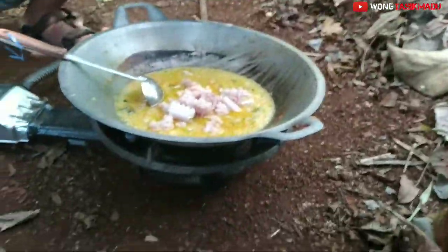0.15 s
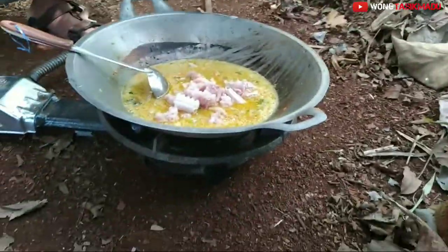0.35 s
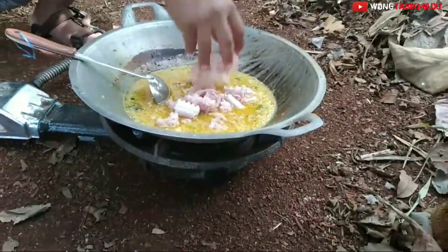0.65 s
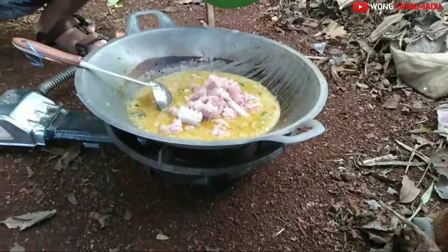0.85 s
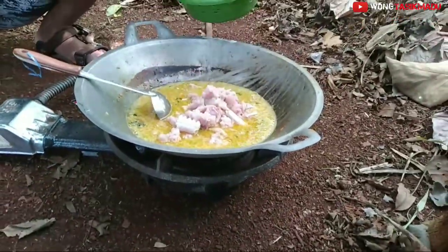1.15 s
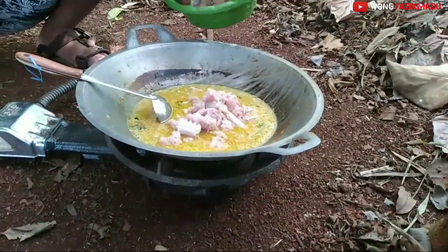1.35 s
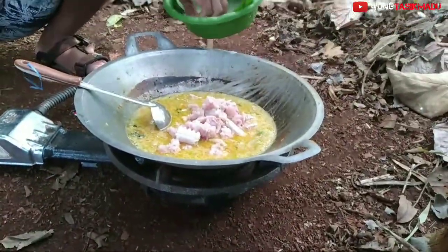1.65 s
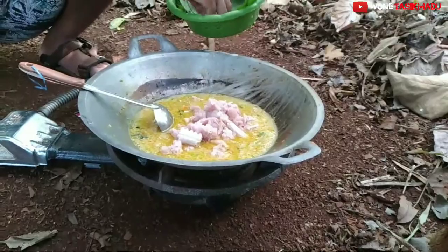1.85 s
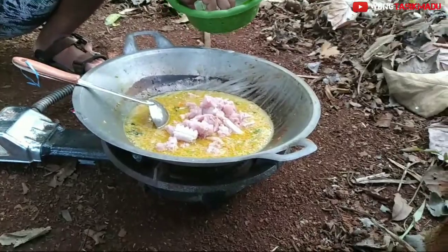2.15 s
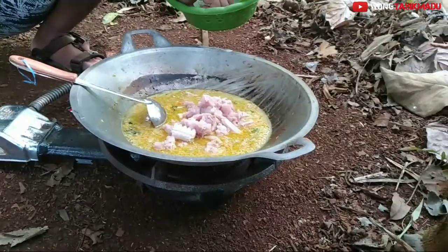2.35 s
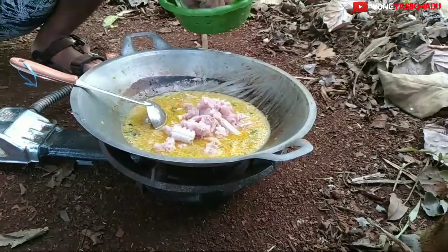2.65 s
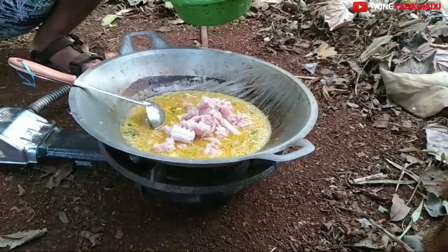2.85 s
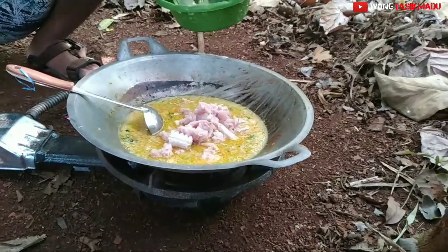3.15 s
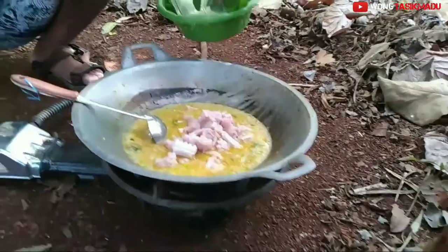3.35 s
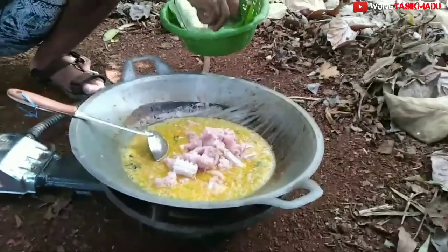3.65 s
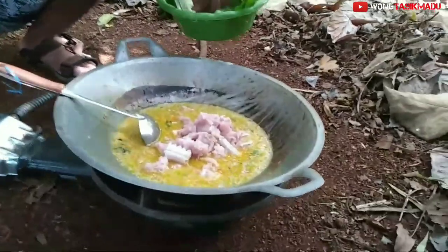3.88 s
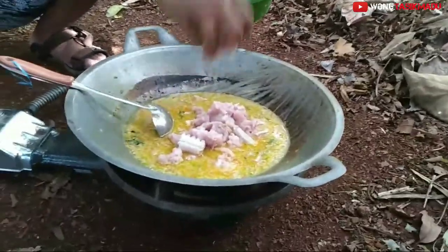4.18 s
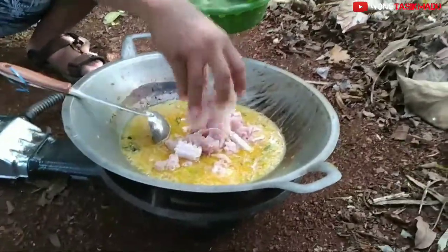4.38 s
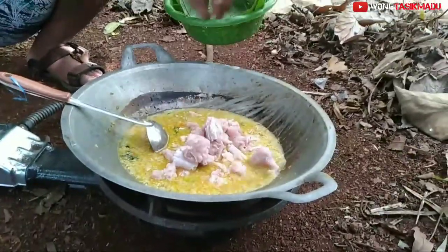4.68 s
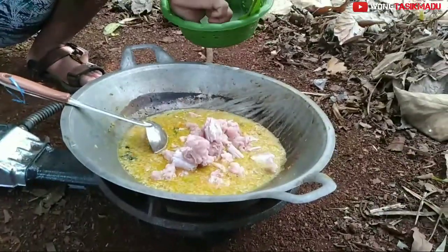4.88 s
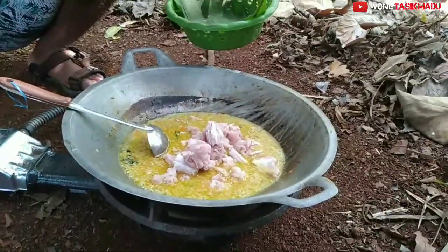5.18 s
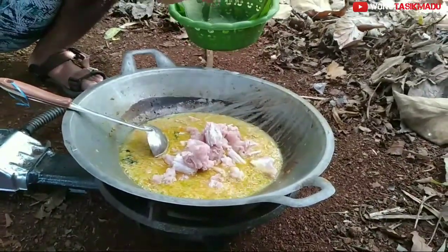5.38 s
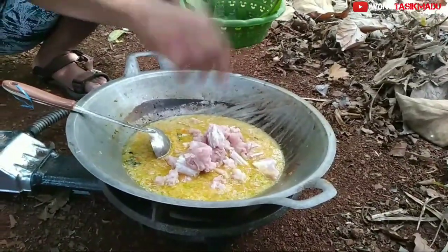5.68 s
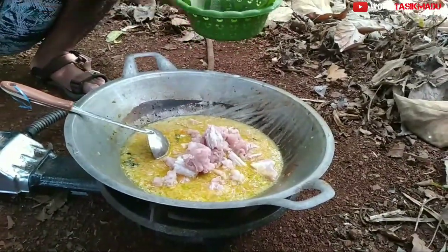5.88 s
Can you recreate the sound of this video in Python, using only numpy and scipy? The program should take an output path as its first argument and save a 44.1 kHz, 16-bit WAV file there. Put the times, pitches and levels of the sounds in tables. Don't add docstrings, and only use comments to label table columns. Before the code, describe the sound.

Outdoors, a wok of broth sizzles close by over a gas ring, its fine steam hiss surging and dipping. After half a second it becomes livelier, with sharp spits, brief flares on hot metal and small wet plops as meat drops in. Soft thumps come from the ground, and a distant engine hums faintly later. A phone picks it up in wide, uneven stereo, with the crisp treble stronger on the right and the top end slightly ragged.

```python
import sys
import numpy as np
from scipy import signal
from scipy.io import wavfile
from scipy.ndimage import uniform_filter1d, minimum_filter1d

SR = 44100
rng = np.random.default_rng(int(sys.argv[2]) if len(sys.argv) > 2 else 0)


def boost_factor(decibels):
    exponent = np.asarray(decibels, float) / 20
    return 10 ** exponent


def generate_wav(signal):
    frames = np.transpose(np.atleast_2d(signal))
    scaled = np.clip(frames, -1, 1) * 32767
    pcm = np.round(scaled).astype(np.int16)
    wavfile.write(sys.argv[1], SR, pcm)


N = 265923


def rms_one(x):
    return x / np.sqrt(np.mean(x ** 2) + 1e-20)


def in_time(rows):
    s, *columns = np.transpose(rows)
    return [np.interp(np.arange(N) / SR, s, c) for c in columns]


def at_hz(points, hz):
    points_hz, level_db = np.transpose(points)
    return np.interp(np.log(hz), np.log(points_hz), level_db)


def drift(rate_hz):
    r = np.exp(-80 * np.pi * rate_hz / SR)
    slow = signal.lfilter([1], [1, -2 * r, r * r], rng.standard_normal(N // 40 + 2002))[2000:]
    return np.interp(np.arange(N) / 40, np.arange(len(slow)), rms_one(slow))


def swells(rows):
    t = np.arange(N) / SR
    total_db = np.zeros(N)
    for crest_s, height_db, rise_s, fall_s in rows:
        corners_s = [crest_s - max(rise_s, .002), crest_s, crest_s + max(fall_s, .002)]
        total_db += np.interp(t, corners_s, [0, height_db, 0])
    return total_db


def resonance(x, hz, width_hz):
    r = np.exp(-np.pi * width_hz / SR)
    return signal.lfilter([(1 - r * r) / 2, 0, (r * r - 1) / 2], [1, -2 * r * np.cos(2 * np.pi * hz / SR), r * r], x)


def modes(x, table):
    return sum(boost_factor(db) * resonance(x, hz, width) * (-1) ** k for k, (hz, width, db) in enumerate(table))


# time_s, level_db
RIM_HEAT = [(0, -56.5), (.53, -58.5), (.66, -54), (1.03, -54), (1.14, -53), (1.93, -54.5), (2.42, -52.5),
            (2.65, -49.5), (3.04, -46), (3.22, -48), (4.1, -47.5), (4.32, -53), (4.5, -45.5), (4.68, -56),
            (5.146, -49), (5.156, -46), (5.64, -46.5), (6.03, -51)]
# crest_s, over_heat_db, rise_s, fall_s
BOIL_SURGES = [(.244, 5.5, 0.028, 0.075), (.6, 1.5, 0.097, .005), (.67, 1.5, 0.074, 0.016),
               (.72, 8, 0.014, 0.026), (.84, 6, 0.074, 0.04), (1.435, 5, .012, .015),
               (1.055, 9.5, 0.021, 0.036), (1.24, 3.5, 0.13, 0.039), (1.44, 3.5, 0.17, 0.18),
               (1.65, 5, 0.11, 0.013), (1.8, 7, 0.14, 0.064), (1.9, 8, 0.039, 0.017),
               (2.05, 7.5, 0.14, 0.018), (2.14, 7, 0.12, 0.041), (2.25, 8.5, 0.084, 0.062),
               (2.33, 5.5, 0.019, 0.084), (2.45, 5.5, 0.023, 0.16), (3.35, 2, .04, 0.018),
               (3.47, 8, .1, 0.05), (3.62, 3.5, 0.18, 0.011), (3.71, 8.5, 0.033, 0.038),
               (3.76, 7.5, 0.01, 0.011), (3.83, 3, 0.032, 0.13), (4.02, 8.5, 0.036, 0.084),
               (4.14, 7, 0.056, 0.4), (4.35, 4, 0.013, 0.073), (4.82, 10, 0.16, 0.01),
               (4.89, 8.5, 0.038, 0.084), (5.078, 3, .012, .015), (5.154, 7, 0.0043, 0.022),
               (4.649, 4.5, .005, 0.0028), (4.692, 8.5, 0.0087, 0.014), (4.915, 0, .008, 0.0073),
               (5.102, 9, .004, .004), (5.143, 3, .004, .005), (5.27, 2.5, 0.022, 0.044),
               (5.325, 6, .015, 0.018), (5.41, 3, .025, 0.1), (5.48, 2.5, 0.016, 0.018),
               (5.54, 0.5, .015, .015), (5.635, 0.5, .012, .01), (3.433, 3, .005, .01),
               (3.461, 2, .004, .006), (3.474, 4, .004, .005), (3.499, 4, .004, .006),
               (.709, 3, .003, .002), (2.95, 1.5, 0.046, .05)]
# crest_s, change_db, rise_s, fall_s
BOIL_SWINGS = [(.604, -1, .004, 0.024), (0.724, -15, 0.0037, 0.0054), (3.26, -8.5, 0.034, 0.065),
               (3.67, -1.5, 0.044, 0.016), (4.47, -4.5, 0.1, 0.019), (4.85, 0, .02, .02),
               (.61, 0, .008, .012), (.897, 2.5, .01, 0.014), (1.01, -1, .03, .02),
               (2.67, -3.5, 0.022, 0.023), (4.32, -3, .04, .015), (4.658, -2, .005, 0.012),
               (4.722, -6, .015, 0.018), (4.9, -9, 0.0055, 0.0088), (5.0, 1.5, .06, .06),
               (5.135, -7.5, 0.04, .012), (5.65, -8, .01, 0.066)]


def boil_db():
    return in_time(RIM_HEAT)[0] + swells(BOIL_SURGES + BOIL_SWINGS)


def boil_trend_db():
    return uniform_filter1d(boil_db(), size=4410) + 50


def boil_level():
    return np.sqrt(boost_factor(boil_db()) ** 2 + flare_power())


# left_port_lag_samples, level_db
PAN_SPOTS = [(16, -1), (14.5, -2), (30, -2), (8, -3.5), (-1.5, -3.5), (-12.5, -1.5), (-22, -1), (38.5, -6),
             (30, -25), (-34.5, -3.5)]


def steam_bursts(per_s, spread_db, flurry_db):
    out = np.zeros((2, N))
    for lag, spot_db in PAN_SPOTS:
        at = np.flatnonzero(rng.random(N) < per_s / SR)
        size, sign = rng.random((2, len(at)))
        bursts = np.zeros(N)
        bursts[at] = boost_factor(spread_db * np.minimum(-np.log(size), 5)) * np.sign(sign - .5)
        bursts *= boost_factor(spot_db + flurry_db * drift(21.0))
        out += [np.roll(bursts, round(lag)), bursts]
    rim_flutter_db = 0.79 * drift(38.0) + 0.3 * drift(92)
    return rms_one(out) * boost_factor(rim_flutter_db)


# freq_hz, density_db
BURST_COLOUR = [(700, -14), (1400, -19.5), (2200, -10.5), (3700, -3.5), (5200, -3), (6500, -1), (8500, -4),
                (12000, -1), (15500, -5.5)]


def burst_colour(x):
    hz = np.linspace(0, SR / 2, 257)
    shape = signal.firwin2(127, hz, boost_factor(at_hz(BURST_COLOUR, hz + 1)), fs=SR)
    return signal.fftconvolve(x, shape[None] / np.sqrt(np.sum(shape ** 2)), mode="same", axes=1)


# crest_s, above_11khz_db, rise_s, fall_s
MEAT_FIZZ = [
    (2.5, -2.5, 0.42, .6),
    (5.17, 4.5, 0.03, .5),
    (6.03, 10, 0.19, .1),
]
BRIGHT_DB, BRIGHT_PER_BOIL_DB = -1.5, -0.015
COLD_DULL_DB, WARM_AT_S, WARM_UP_S = -4, 0.56, 0.13


def brightness_db():
    cold_share = np.clip((WARM_AT_S - np.arange(N) / SR) / WARM_UP_S, 0, 1)
    return BRIGHT_DB + COLD_DULL_DB * cold_share + BRIGHT_PER_BOIL_DB * boil_trend_db() + swells(MEAT_FIZZ)


# time_s, left_minus_right_top_octave_db
PORT_TURN = [(0, -8), (1.06, -8.5), (1.16, -4.5), (2.0, -8), (2.62, -8), (3.59, -8), (3.81, -8),
             (4.05, -12.5), (4.77, -14), (6.03, -13)]
# freq_hz, width_hz, level_db
WOK_WALL = [(2460, 44, -2), (3295, 54, -3.5), (4060, 27, -4), (5860, 27, -6), (9740, 75, -4),
            (10780, 44, -8), (10650, 110, -7), (11350, 300, -16), (12100, 54, -8)]
# freq_hz, width_hz, level_db
PORT_CAVITY = [(9780, 1750, 0.5), (10970, 980, 6), (12350, 1600, -2), (15500, 1400, -3.5)]


def sizzle():
    turn_db, = in_time(PORT_TURN)
    bursts = boil_level() * boost_factor(turn_db + 8.0) * steam_bursts(1500, spread_db=-2.0, flurry_db=2.5)
    pan = burst_colour(bursts + spits())
    pan = pan + modes(pan, WOK_WALL)
    treble = signal.sosfiltfilt(signal.butter(2, 11500, "high", fs=SR, output="sos"), pan)
    left, right = pan + (boost_factor(brightness_db()) - 1) * treble
    return np.array([left, right + boost_factor(4.0 - turn_db) * modes(right, PORT_CAVITY)])


# freq_hz, correlation
PORT_LIKENESS = [(30, 1), (60, 0.65), (92, 0.83), (140, 0.97), (210, 0.91), (330, 0.68), (500, 0.9),
                 (770, 0.73), (1170, -0.28), (1790, -0.32), (2740, 0.088), (4190, -0.1), (6410, -0.033),
                 (9810, 0.72), (15000, 0.8)]


def banded_noise(spectrum, low_hz, count, patchy_db):
    out, edges = 0, low_hz * 2 ** (np.arange(count + 1) / 2)
    run_in = SR // 4
    white = rng.standard_normal((2, 2, N + run_in))
    for k, (low, high) in enumerate(zip(edges, edges[1:])):
        band = signal.butter(2, [low, high], "band", fs=SR, output="sos")
        mid, side = signal.sosfilt(band, white[k % 2])[:, run_in:]
        hz = np.sqrt(low * high)
        alike = np.clip(at_hz(PORT_LIKENESS, hz), -1, 1)
        gain = boost_factor(at_hz(spectrum, hz) + patchy_db * drift(7.2))
        out = out + gain * (np.sqrt(1 + alike) * mid + np.sqrt(1 - alike) * side * [[1], [-1]])
    return rms_one(out)


# freq_hz, density_db
JET_SPECTRUM = [(900, -5), (1800, -20), (2600, -7.5), (3700, 1.5), (5200, -2), (6500, -3), (8500, -3.5),
                (12000, -8), (15500, -21)]


def flame_jet():
    jet_db = -56.5 + 0.53 * boil_trend_db()
    return boost_factor(jet_db) * banded_noise(JET_SPECTRUM, 1033, count=8, patchy_db=0.5)


# freq_hz, density_db
ROAR_SPECTRUM = [(120, -30), (200, -6), (355, -7), (747, -3.5), (1670, -4.5), (2390, -4.5), (2890, -7.5),
                 (3500, -5), (4550, -35), (7700, -120)]


def flame_roar():
    return boost_factor(-62.5) * banded_noise(ROAR_SPECTRUM, 193.7, count=8, patchy_db=1.67)


# freq_hz, density_db
RUMBLE_SPECTRUM = [(8.8, -29), (25, 0), (37, -3.5), (60, -5.5), (97, -8.5), (145, -13.5), (173, -14),
                   (245, -22), (300, -17), (390, -55), (660, -120)]
# crest_s, lift_db, rise_s, fall_s
RUMBLE_SWELLS = [
    (.48, 1, 0.36, 0.17),
    (1.8, 2, 0.065, 0.054),
    (2.0, 2.5, 0.065, 0.29),
    (3.53, 1.5, 0.076, 0.077),
    (4.13, 5, 0.44, 0.027),
    (4.52, 1.5, 0.4, .2),
]


def air_rumble():
    return boost_factor(-60.5 + swells(RUMBLE_SWELLS)) * banded_noise(RUMBLE_SPECTRUM, 23.5, count=8, patchy_db=2.0)


# start_s, peak_db, pitch_hz
GROUND_THUMPS = [(0.45, -60, 119), (0.4, -57, 92), (1, -50, 51), (3.38, -56, 62), (2.1, -50, 99),
                 (3.51, -52, 91), (4.5, -52, 41), (4.092, -57, 135), (4.4, -57, 93), (4.798, -74, 72)]


def thumps():
    out, t = np.zeros(N), np.arange(6000) / SR
    for start_s, peak_db, pitch_hz in GROUND_THUMPS:
        i = round(start_s * SR)
        envelope = (1 - np.exp(-t / .008)) * np.exp(-t / .025)
        out[i:i + len(t)] += boost_factor(peak_db + 3) * np.sin(2 * np.pi * pitch_hz * t) * envelope
    return out


# start_s, peak_db, pitch_hz
BROTH_PLOPS = [(0.584, -56, 1390), (0.691, -58, 570), (1.788, -56.5, 730), (1.798, -56, 670),
               (2.891, -56.5, 614), (4.227, -55, 1150), (4.812, -52.5, 760), (4.819, -58, 486),
               (5.361, -57.5, 910), (5.722, -54, 790)]


def plops():
    out, t = np.zeros(N), np.arange(1500) / SR
    for start_s, peak_db, hz in BROTH_PLOPS:
        puff = rng.standard_normal(len(t)) * np.exp(-t / 0.0068)
        slap = resonance(puff, hz, 300) - 0.21 * resonance(puff, 2.0 * hz, 300)
        slap += .5 * resonance(puff, 0.8 * hz, 300)
        bubble = np.sin(2 * np.pi * hz * t) * (1 - np.exp(-t / 0.0022)) * np.exp(-t / 0.0069)
        i = round(start_s * SR)
        out[i:i + len(t)] += boost_factor(peak_db) * (1.4 * slap / np.abs(slap).max() + bubble)
    return out


# start_s, peak_db, length_s
METAL_FLARES = [
    (0.588, -51, 0.012),
    (0.6644, -48, 0.012),
    (1.426, -35, 0.0096),
    (2.407, -35, 0.012),
    (4.431, -33, 0.019),
    (4.643, -43, 0.0055),
    (5.5917, -35.5, 0.012),
    (5.84, -52, 0.011),
]


def flare_power():
    power, t = np.zeros(N), np.arange(4000) / SR
    for start_s, peak_db, length_s in METAL_FLARES:
        i = round(start_s * SR)
        flare = boost_factor(peak_db - 8.5) * (1 - np.exp(-t / 0.0011)) * np.exp(-t / max(length_s, .003))
        power[i:i + len(t)] += flare[:N - i] ** 2
    return power


# start_s, peak_db, left_minus_right_db, pitch_hz
LARGE_SPITS = [(0.716, -24.5, 6.5, 7620), (1.048, -41, 0.5, 7100), (1.4313, -54, 0, 3770),
               (1.4852, -30.5, 11, 6300), (1.629, -29.5, 0, 5600), (2.0494, -46, -1, 6380),
               (2.2494, -42, 2, 5950), (3.21, -34.5, -8, 5600), (3.429, -52, -6, 5600),
               (3.7, -41, -5, 7700), (4.015, -31, -7, 7400), (4.637, -38.5, -12, 4360),
               (5.154, -39.5, -7, 5800), (0.593, -37, -7, 10800), (0.6685, -45, -6, 11800)]
# delay_s, pitch_share, size_share
FALLING_DROPS = [
    (.0019, 0.44, 0.11),
    (.0032, 0.493, 0.083),
    (.0045, .95, .2),
    (.0072, .32, 0.45),
]


def spits():
    out, t = np.zeros((2, N)), np.arange(900) / SR
    for start_s, peak_db, pan_db, hz in LARGE_SPITS:
        swell = np.exp(-((t - .0012) / 0.00034) ** 2) + 0.69 * np.exp(-((t - .0018) / 0.0002) ** 2)
        ring = np.sin(2 * np.pi * hz * t)
        ring += 0.43 * np.sin(1.6 * np.pi * hz * t) + 0.2 * np.sin(np.pi * hz * t)
        spray = rng.standard_normal((2, len(t))) * np.exp(-t / 0.0044) * (t > .002)
        spray = resonance(spray, 0.48 * hz, 5600)
        drops = np.zeros(len(t))
        for delay_s, share, size in FALLING_DROPS:
            drops += size * np.exp(-((t - delay_s) / 0.00038) ** 2) * np.sin(2 * np.pi * share * hz * t)
        gain = boost_factor(peak_db - 7.0 + pan_db / 2 * np.array([[1], [-1]]))
        i = round(start_s * SR)
        out[:, i:i + len(t)] += gain * (0.46 * swell * ring + spray + drops)
    return out


# start_s, end_s, pitch_hz, level_db
LORRY_TONES = [
    (4.36, 4.63, 63.4, -56.5),
    (4.63, 4.74, 62.1, -61),
    (4.76, 4.86, 62.6, -59),
    (4.97, 5.13, 63.8, -59.5),
    (5.13, 5.4, 63.9, -57.5),
    (5.46, 5.65, 65.1, -62),
    (4.9, 5.2, 57.4, -70),
]
PUMP_LOW_TONES = [
    (2.2, 4.02, 172.1, -72.5),
    (4.05, 4.2, 174, -81),
    (4.25, 4.5, 179, -78),
    (5.2, 6.6, 175.5, -71.5),
]
PUMP_HIGH_TONES = [
    (2.3, 4.74, 214, -73.5),
    (4.9, 5.4, 219.5, -75.5),
]


def engine(rows, waver_db):
    t, out = np.arange(N) / SR, 0
    for start_s, end_s, pitch_hz, level_db in rows:
        along = (t - start_s) / (end_s - start_s)
        fade = np.clip(np.minimum(along, 1 - along) / 0.25, 0, 1)
        out = out + boost_factor(level_db) * fade * np.sin(2 * np.pi * pitch_hz * t)
    return np.sqrt(2) * boost_factor(waver_db * drift(25.0)) * out


def scene():
    engines = engine(LORRY_TONES, 1.8) + engine(PUMP_LOW_TONES, 0.47) + engine(PUMP_HIGH_TONES, 2.0)
    return sizzle() + flame_jet() + flame_roar() + air_rumble() + thumps() + plops() + engines


# freq_hz, share_quiet_top, share_loud_top
STARVED_SUM = [(1300, 0, 0), (1700, .1, .5), (2000, .1, .7), (2400, .05, .2), (2900, .9, 1.1),
               (3400, .7, .8), (4200, 1.7, 1.4), (4800, .8, .6), (5300, 1.4, .9), (5900, .1, .2),
               (6500, .05, .4), (7200, .05, .3), (7700, 0, 0)]
# freq_hz, share_quiet_top, share_loud_top
STARVED_DIFFERENCE = [(2000, 0, 0), (2500, 1.5, .8), (3000, .9, 1), (3900, .5, 1.6), (4400, .4, 1),
                      (4800, .2, .4), (5300, 1.3, 1.4), (5800, .3, .4), (6300, 0, 0)]
VANISHING_STRIPS = [
    (.006, 4, 3),
    (.006, 6, 2),
    (.002, 11, 2),
    (.004, 12, 1),
]
WEAK_SHARE = .35


def starve(cells, hz, starved, quiet, loud):
    starved_hz, if_quiet, if_loud = np.transpose(starved)
    share = np.outer(np.interp(hz, starved_hz, if_quiet), quiet)
    share += np.outer(np.interp(hz, starved_hz, if_loud), loud)
    power = uniform_filter1d(uniform_filter1d(cells ** 2, size=5, axis=0), size=2, axis=1)
    local = uniform_filter1d(uniform_filter1d(power, size=31, axis=0), size=9, axis=1)
    cells *= power >= WEAK_SHARE * np.sqrt(share) * local
    for chance, bins, frames in VANISHING_STRIPS:
        seeds = 1. * (rng.random(share.shape) >= chance * share)
        cells *= minimum_filter1d(minimum_filter1d(seeds, bins, axis=0), frames, axis=1)


# centre_s, centre_hz, width_hz, length_s
LOST_SUM_BANDS = [(.83, 4600, 400, .05), (1.49, 4010, 250, .03), (1.76, 4000, 300, .05),
                  (1.85, 5330, 250, .06), (2.24, 4450, 350, .03), (2.39, 4620, 250, .04),
                  (2.87, 4450, 300, .05), (3.05, 1800, 200, .03), (3.46, 1430, 200, .03),
                  (3.91, 2020, 200, .03), (4.05, 1950, 250, .03), (4.28, 5450, 250, .03),
                  (4.35, 3000, 250, .03), (4.37, 4180, 250, .04), (4.49, 4900, 250, .03),
                  (4.49, 2850, 250, .03), (4.81, 3260, 250, .03), (5.255, 3880, 250, .03),
                  (4.73, 4080, 300, .06), (4.81, 6600, 250, .03), (4.84, 6320, 300, .03),
                  (5.03, 6700, 250, .03), (5.185, 6600, 450, .03), (5.255, 4900, 350, .03),
                  (5.32, 3150, 300, .03), (5.35, 6600, 450, .03), (5.47, 6550, 350, .04),
                  (5.58, 6550, 450, .04), (5.73, 6600, 400, .03), (5.82, 2980, 250, .05),
                  (5.845, 6600, 500, .06)]


def phone_dropouts(x):
    hop, lead = 1024, 1214
    n, k = np.arange(2 * hop) + .5, np.arange(hop) + .5
    window = np.sin(np.pi * n / (2 * hop))[:, None]
    basis = np.sqrt(2 / hop) * window * np.cos(np.pi / hop * np.outer(n + hop / 2, k))
    padding = ((0, 0), (lead, 2 * hop - (lead + N) % hop))
    blocks = np.pad([x[0] + x[1], x[0] - x[1]], padding).reshape(2, -1, hop)
    cells = (np.concatenate([blocks[:, :-1], blocks[:, 1:]], axis=2) @ basis).transpose(0, 2, 1)
    hz = k * SR / (2 * hop)
    s = ((np.arange(cells.shape[2]) + 1) * hop - lead) / SR
    top_db = 10 * np.log10((cells[:, hz > 9000] ** 2).sum((0, 1)) + 1e-20)
    top_db = uniform_filter1d(top_db, size=25)
    top_db = top_db - top_db.mean()
    quiet = np.interp(top_db, [-8, -3, 1], [0, 1, 0])
    loud = np.interp(top_db, [-8, -3, 1], [0, 0, 1])
    starve(cells[0], hz, STARVED_SUM, quiet, loud)
    starve(cells[1], hz, STARVED_DIFFERENCE, quiet, loud)
    for centre_s, centre_hz, width_hz, length_s in LOST_SUM_BANDS:
        in_band = np.abs(hz - centre_hz) < width_hz / 2
        in_span = np.abs(s - centre_s) < length_s / 2 + .008
        cells[0][np.ix_(in_band, in_span)] = 0
    frames = cells.transpose(0, 2, 1) @ basis.T
    joined = (frames[:, 1:, :hop] + frames[:, :-1, hop:]).reshape(2, -1)
    mid, side = joined[:, lead - hop:lead - hop + N] / 2
    return np.array([mid + side, mid - side])


def roll_off(x):
    return signal.sosfilt(signal.butter(12, 15560, fs=SR, output="sos"), x)


# freq_hz, width_hz, level_db
LEFT_PORT_BUMPS = [(3610, 190, -9.5), (7400, 1500, -10.5)]


def record(dry):
    bumps = sum(boost_factor(db) * resonance(dry[0], hz, width) for hz, width, db in LEFT_PORT_BUMPS)
    ports = signal.lfilter(*signal.butter(1, 50, "high", fs=SR), [dry[0] + bumps, dry[1]])
    cut = signal.sosfilt(signal.ellip(12, .5, 80, 15560, fs=SR, output="sos"), ports)
    mix = phone_dropouts(cut)
    return roll_off(mix)


dry = scene()
out = record(dry)
generate_wav(out)
```